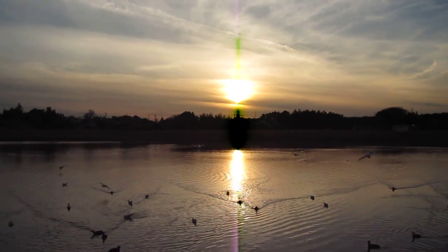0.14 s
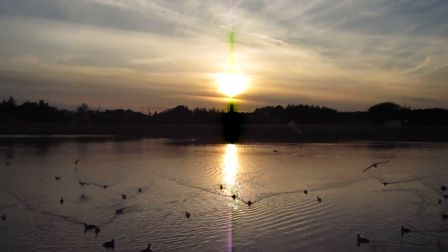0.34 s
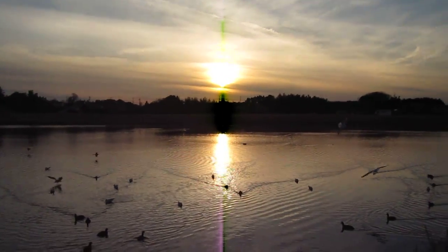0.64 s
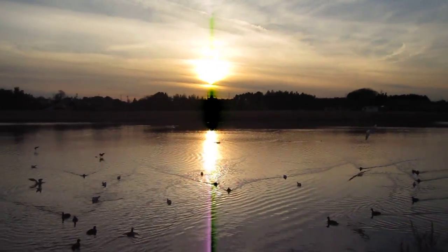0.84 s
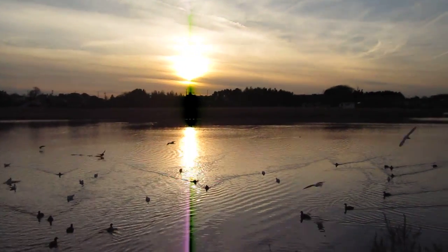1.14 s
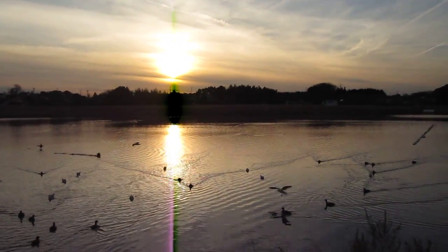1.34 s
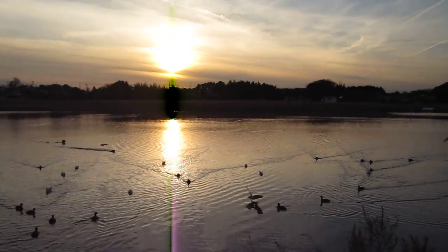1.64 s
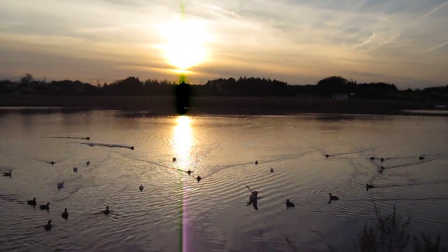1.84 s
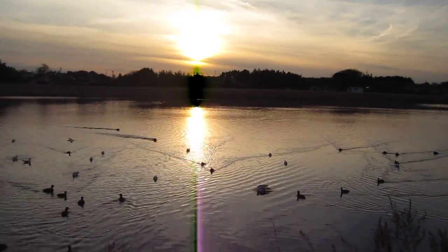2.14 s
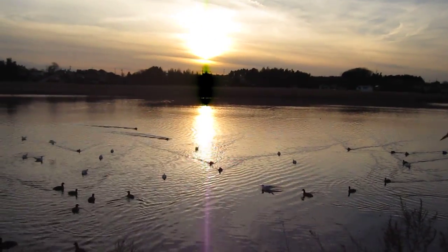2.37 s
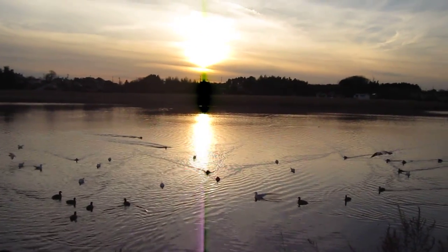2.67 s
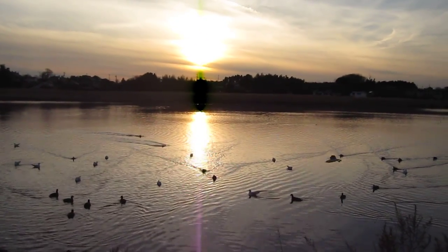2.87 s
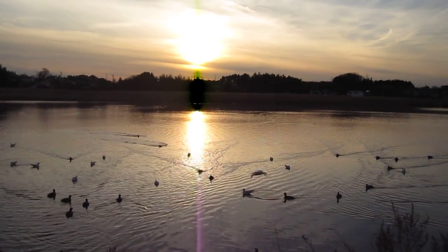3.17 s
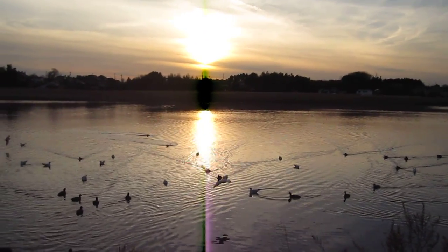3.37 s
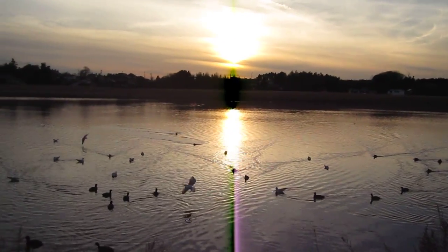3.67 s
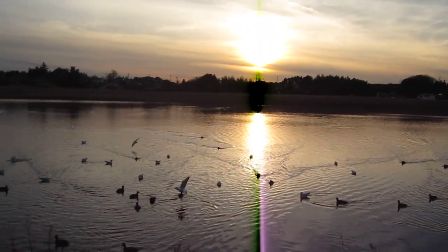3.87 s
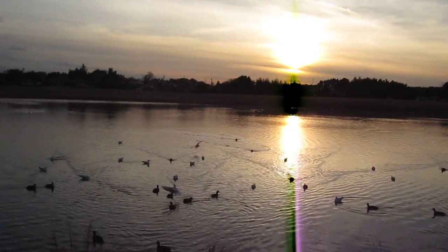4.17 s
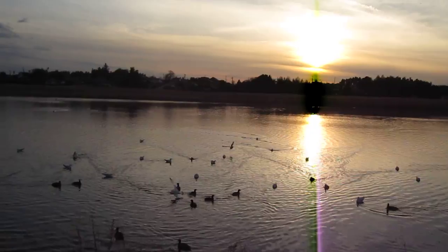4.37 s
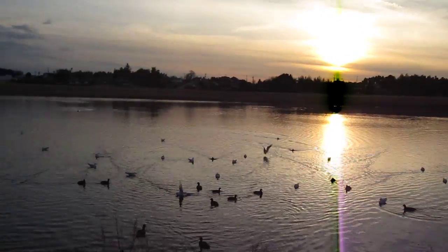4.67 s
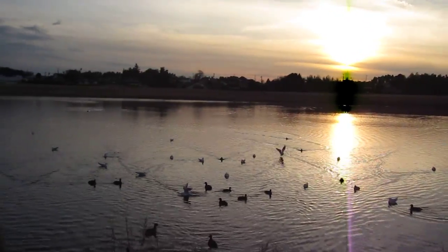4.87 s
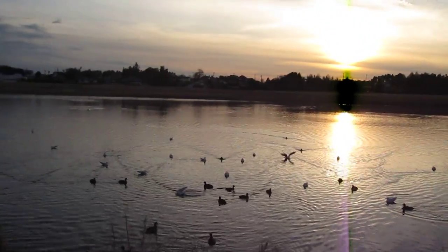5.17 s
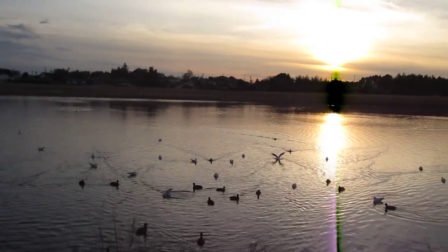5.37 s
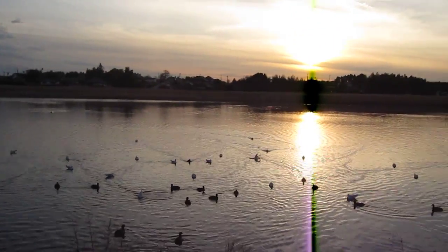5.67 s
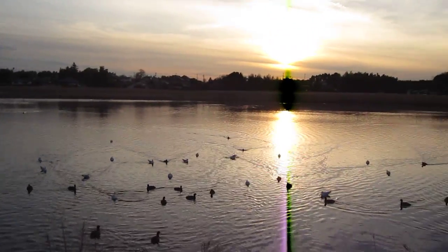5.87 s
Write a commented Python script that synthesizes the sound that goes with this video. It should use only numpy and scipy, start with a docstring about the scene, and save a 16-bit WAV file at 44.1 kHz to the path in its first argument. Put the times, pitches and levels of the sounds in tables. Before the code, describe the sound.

A quiet lakeside heard from the bank, with steady, faint, low-weighted outdoor noise throughout. From about 0.7 s small plops and drops appear, with one strong hollow plop near 1.0 s; splashing swells into a light fizz of bubbles and spray, busiest around 1.2 to 1.9 s. At 1.96 s a gull yelps sharply upward, then screams until 2.58 s: a high whistle sinking in pitch, roughened by an unstable lower voice and rasp. Gentle stirring continues, with crisp drops around 2.7 to 2.95 s and rounder plops near 3.4 s. At 4.04 s a second yelp rises into another falling scream, more broken, with a ragged croak and brief buzz around 4.4 to 4.5 s, ending near 4.6 s. A faint dull echo trails each cry. Splashing then dwindles; soft low bumps brush the microphone around 5.1 to 5.5 s, leaving quiet air and tiny water sounds.

```python
"""Two harsh gull screams over a calm lake, heard from the bank.
Each opens with a rising harmonic yelp, then splits into a high whistle and an irregular lower voice;
the two multiply into sum and difference tones, with rasping noise. The second also croaks and buzzes.
Water birds splash and plop: ringing bubbles, drops and noise spray.
Steady filtered noise lies far off; a few soft low bumps reach the microphone."""
import sys
import numpy as np
from scipy import signal
from scipy.fft import rfft, irfft, next_fast_len
from scipy.io import wavfile

SR = 44100
rng = np.random.default_rng(int(sys.argv[2]) if len(sys.argv) > 2 else 0)


def bounce(signal):
    """Save signal as a 16-bit WAV file at the path given by the first command-line argument."""
    frames = np.transpose(np.atleast_2d(signal))
    limited = np.clip(frames, -1, 1)
    pcm = np.round(limited * 32767).astype(np.int16)
    wavfile.write(sys.argv[1], SR, pcm)


N = 265237
T = np.arange(N) / SR


def undb(db):
    """Decibels to amplitude gain."""
    return 10 ** (np.asarray(db) / 20)


def unit(x):
    """Scale to rms 1."""
    return x / np.sqrt(np.mean(np.abs(x) ** 2))


def curves(rows):
    """Table columns after the first, interpolated over time."""
    s, *columns = np.transpose(rows)
    return [np.interp(T, s, c) for c in columns]


def gate(start_s, end_s, edge_s):
    """Open from start to end, with linear edges."""
    inside_s = np.minimum(T - start_s, end_s - T)
    return np.clip(inside_s / edge_s + .5, 0, 1)


def hump(centre_s, width_s):
    """Gaussian swell to 1; width is to 1/e."""
    return np.exp(-((T - centre_s) / width_s) ** 2)


def colour(x, points):
    """Filter by a spectrum of (freq_hz, gain_db) points; rms 1."""
    point_hz, point_db = np.transpose(points)
    size = next_fast_len(N)
    hz = np.maximum(np.arange(size // 2 + 1) * SR / size, 1)
    gain = undb(np.interp(np.log(hz), np.log(point_hz), point_db))
    return unit(irfft(rfft(x, size) * gain, size)[:N])


def wander(rate_hz):
    """Low-passed noise, rms 1: random change up to about rate_hz."""
    lowpass = signal.butter(2, rate_hz, fs=SR, output="sos")
    return unit(signal.sosfilt(lowpass, rng.standard_normal(N)))


def add(out, start_s, sound):
    """Mix a short sound into out."""
    i = int(start_s * SR)
    out[i:i + len(sound)] += sound[:N - i]


def turns(hz):
    """Oscillator phase in radians: the running sum of frequency."""
    return 2 * np.pi * np.cumsum(hz) / SR


def harmonics(phase, tones):
    """Stack of (multiple, level_db) partials on one phase."""
    return sum(undb(db) * np.sin(round(k) * phase) for k, db in tones)


# distant noise spectrum: freq_hz, density_db
AIR_SPECTRUM = [(15, -26), (25, -5), (45, 0), (65, -1.5), (188, -7.5), (291, -7.5), (427, -11), (503, -12),
                (661, -12.5), (822, -11.5), (892, -13), (1270, -14), (1700, -15.5), (2050, -18.5),
                (2520, -23), (3490, -23), (6360, -26.5), (17000, -35.5)]
AIR_RMS_DB = -48


def air():
    """Steady far-off outdoor noise: white noise shaped by a fixed spectrum."""
    return colour(rng.standard_normal(N), AIR_SPECTRUM) * undb(AIR_RMS_DB)


def bubble(hz, ring_s, glide_oct):
    """Air pocket: swells quickly, rings and decays; pitch rises glide_oct per ring_s as it surfaces."""
    age = T[:int(2 * ring_s * SR)] / ring_s
    swell = age ** 2 * np.exp(-11 * age)
    return swell / swell.max() * np.sin(turns(hz * 2 ** (glide_oct * age)))


# soft microphone bumps: start_s, level_db, pitch_hz
MIC_BUMPS = [(5.062, -48, 88), (5.317, -36.5, 84.5), (5.349, -35.5, 89), (5.475, -38.5, 80)]


def bumps():
    """Dull knocks of a cycle or two on the microphone: low rings of constant pitch."""
    out = np.zeros(N)
    for start_s, level_db, pitch_hz in MIC_BUMPS:
        add(out, start_s, undb(level_db) * bubble(pitch_hz, ring_s=0.033, glide_oct=0))
    return out


# course of the stirring before STIR_GAIN_DB: time_s, relative_db
STIR_COURSE = [(0.0, -69), (0.526, -73), (0.982, -55.5), (1.65, -50.5), (2.85, -53.5), (3.5, -58.5),
               (4.75, -56), (5.3, -66)]
# brief small rises and dips in the stirring: centre_s, change_db
STIR_SWELLS = [(1.36, 1), (1.54, -1), (1.65, 0.5)]
STIR_GAIN_DB, SWELL_WIDTH_S = 8, 0.03


def stirring():
    """Gain for how hard the birds stir the water: a slow course, nudged up or down for a moment."""
    course_db, = curves(STIR_COURSE)
    swells_db = sum(change_db * hump(s, SWELL_WIDTH_S) for s, change_db in STIR_SWELLS)
    return undb(course_db + STIR_GAIN_DB + swells_db)


# splash spectrum: freq_hz, gain_db
SPLASH_SPECTRUM = [(150, -14.5), (400, -4.5), (750, 0), (1100, -1), (2300, 0), (2700, -3.5), (3500, -2),
                   (5500, -9.5), (8000, -13), (12000, -20), (16000, -43)]


def splashing(count=2000, db_per_log_size=1.0, bubbles_db=-7.0, spray_db=-2):
    """Feet and wings stir the water: many small bubbles and a crackle of modulated noise spray."""
    fizz = np.zeros(N)
    for when, pitch, size in rng.random((count, 3)):
        hz = 550 * 12 ** pitch
        gain = undb(db_per_log_size * np.log(size + 0.013)) * np.sqrt(hz)
        add(fizz, when * T[-1], gain * bubble(hz, ring_s=11 / hz, glide_oct=0.031))
    crackle_db = 2.8 * wander(1500) + 1.9 * wander(45)
    spray = rng.standard_normal(N) * undb(crackle_db)
    bubbles = undb(bubbles_db) * colour(fizz, SPLASH_SPECTRUM)
    return stirring() * (bubbles + undb(spray_db) * colour(spray, SPLASH_SPECTRUM))


# sharpest drops: start_s, peak_db, pitch_hz, spray_decay_ms, spray_0_1
SHARP_DROPS = [(.823, -33.5, 2280, 1.6, .3), (.877, -37.5, 3800, 1.2, 1), (.957, -35, 4700, 2.8, 1),
               (.992, -32.5, 2700, 2.9, 0.5), (1.108, -35, 5000, 2.4, 1), (1.178, -37, 4020, 2, 1),
               (1.325, -35, 3800, 2.4, 1), (1.39, -33, 2175, 2, 0.5), (1.437, -33, 2300, .6, .8),
               (1.451, -34, 4260, 2.8, 1), (1.534, -36, 2240, 1.6, 0.2), (1.652, -30.5, 2410, 1.6, 0.14),
               (1.713, -30, 2260, 1.8, 0.1), (1.728, -33, 4100, 1.5, 1), (2.706, -35, 4400, 1.6, 1),
               (2.745, -28.5, 1860, 1.8, 0.47), (2.842, -27, 2130, 1.7, 0.7),
               (2.885, -31.5, 3800, 0.81, .8), (2.943, -31.5, 2360, .7, 0.34),
               (3.21, -34.5, 2070, 1.5, 0.4)]


def drops(ring_cycles=4.1):
    """Drops hit the surface: a few cycles of ring and a tick of noise spray from that pitch upward."""
    out, t = np.zeros(N), T[:SR // 50]
    for start_s, peak_db, hz, decay_ms, spray in SHARP_DROPS:
        edges_hz = [hz, min(hz * 1.32, SR / 3)]
        band = signal.butter(1, edges_hz, "bandpass", fs=SR, output="sos")
        burst = rng.standard_normal(len(t)) * np.exp(-1000 * t / decay_ms)
        tick = signal.sosfilt(band, burst)
        ring = np.sin(2 * np.pi * hz * t) * np.exp(-t * hz / ring_cycles) * (1 - np.exp(-t * hz))
        hit = spray * tick / np.abs(tick).max() + .5 * ring
        add(out, start_s, undb(peak_db) * hit / np.abs(hit).max())
    return out


def plop(crest_s, hz, width_s, slosh_db, stretch=4.0, spread=1.38):
    """Air pocket swells and dies within a few cycles, in a longer slosh of noise about its pitch."""
    t = T[:SR // 8] - T[SR // 16]
    ratio = max(spread, 1.1)
    band = signal.butter(2, [hz / ratio, hz * ratio], "bandpass", fs=SR, output="sos")
    noise = unit(signal.sosfilt(band, rng.standard_normal(len(t))))
    slosh = noise * np.exp(-(t / (stretch * width_s)) ** 2)
    ring = np.sin(2 * np.pi * hz * t) * np.exp(-(t / width_s) ** 2)
    out = np.zeros(N)
    add(out, crest_s + t[0], ring + undb(slosh_db) * slosh)
    return out


# loudest plops: crest_s, level_db, pitch_hz, half_width_ms, slosh_db (re ring)
LOUD_PLOPS = [(.735, -45, 690, 3.3, -12), (.824, -36, 780, 3, -13), (.897, -41, 800, 3, -12),
              (.929, -34, 644, 3.5, -14), (.937, -36, 637, 2.5, -12), (.987, -23, 715, 3.2, -15),
              (1.109, -40, 690, 4, -12), (1.212, -38, 667, 3.8, -17), (1.224, -36, 570, 3.5, -15),
              (1.232, -31, 540, 3.8, -14), (1.348, -39, 670, 4.8, -13), (1.367, -39, 1150, 3.5, -5.5),
              (1.409, -41, 840, 4, -12), (1.503, -36.5, 720, 4.4, -8), (1.533, -37.5, 690, 4.8, -12),
              (1.559, -39, 1050, 3, -1.5), (1.582, -39.5, 650, 4, -11), (1.632, -40, 900, 3.2, -5),
              (1.792, -40, 650, 4.5, -8), (1.819, -38.5, 1030, 3, -7), (1.831, -40, 700, 3, -8),
              (1.841, -41, 1300, 3, -5), (1.865, -37, 620, 4, -9.5), (1.906, -38, 1750, 3, -7),
              (2.595, -37, 1570, 4.1, -11), (2.72, -40.5, 1034, 9.6, -14), (2.907, -37.5, 780, 3, -11),
              (2.994, -41, 1120, 3, -10), (3.347, -36.5, 970, 4.2, -21), (3.421, -32.5, 680, 3.4, -14),
              (3.433, -39.5, 1500, 2.2, -5.5), (3.473, -40, 1930, 3, -24), (5.151, -41.5, 1180, 2.1, -12),
              (5.416, -44, 704, 8.2, -16)]
PLOP_GLIDE_OCT = 0.15


def plops(count=60, small_db=-7.0, spread_db=10, low_hz=680, octaves=1.34, ring_s=0.021):
    """Birds dip and paddle: set plops, and small ones as loud as the stirring; churn makes them uneven."""
    loud = sum(undb(level_db) * plop(crest_s, hz, half_width_ms / 1000, slosh_db)
               for crest_s, level_db, hz, half_width_ms, slosh_db in LOUD_PLOPS)
    small = np.zeros(N)
    for when, pitch, size in rng.random((count, 3)):
        hz = low_hz * 2 ** (octaves * pitch)
        add(small, when * T[-1], undb(small_db - spread_db * size) * bubble(hz, ring_s, PLOP_GLIDE_OCT))
    churn = 1 + .15 * wander(300)
    return (loud + small * stirring()) * churn


# opening yelps: start_s, end_s, start_hz, end_hz, level_db (before swell), swell_db
OPENING_YELPS = [(1.96, 1.995, 990, 1400, -24, 4.5), (4.044, 4.077, 763, 1236, -16, 15)]
# throat response in each yelp: freq_hz, gain_db
YELP_1_THROAT = [(950, -3), (1250, -3), (1450, 1), (1900, -7), (2250, -2), (2480, 2.5), (2750, -11),
                 (3000, -7), (3350, -3), (3650, -19), (4100, -7), (4650, 1), (5100, -11), (5600, -15),
                 (5950, -17), (6550, -5), (7400, -18), (9300, -35), (12000, -20), (16000, -27)]
YELP_2_THROAT = [(750, -12), (1150, -7), (1600, 8.5), (2000, 5.5), (2350, 7.5), (2650, 2), (3000, 2),
                 (3600, -21), (4700, -5), (5400, -27), (6800, -5), (7500, -26), (9500, -27), (11300, -20),
                 (16000, -40)]
YELP_EDGE_S = .008


def yelp(row, throat, dull_db, jitter=0.011, bend=1.3, count=12):
    """Both syrinx sides lock on one rising pitch; harmonics flare as they cross throat resonances."""
    start_s, end_s, start_hz, end_hz, level_db, swell_db = row
    progress = np.clip((T - start_s) / (end_s - start_s), 0, 1) ** bend
    hz = start_hz * (end_hz / start_hz) ** progress
    tones = []
    for k in range(1, count + 1):
        # harmonics above the second come in as the yelp swells
        dulling_db = dull_db * (k > 2) * (1 - progress)
        tones.append((k, np.interp(k * hz, *np.transpose(throat)) - dulling_db))
    voice = harmonics(turns(hz * (1 + jitter * wander(420))), tones)
    voice = voice / voice[(T > start_s) & (T < end_s)].std()
    swell = undb(level_db - swell_db * (1.5 - progress))
    return voice * swell * gate(start_s, end_s, YELP_EDGE_S)


# bright buzz partials: multiple, level_db
BUZZ_PARTIALS = [(6, -52), (7, -53), (8, -69)]
# croak spectrum: freq_hz, gain_db
CROAK_SPECTRUM = [(1400, -4), (2700, -5), (3900, 1), (4800, 2.5), (5300, 1), (5700, -5), (6200, -1),
                  (6800, -17), (8400, -11.5), (9500, -29), (16000, -36)]
CROAK_START_S, CROAK_END_S, CROAK_DB = 4.403, 4.461, -37.5
BUZZ_START_S, BUZZ_END_S = 4.475, 4.508


def croak(course, jitter=0.06, hiss=0.87):
    """Ragged pulses and air puffs an octave below the whistle ring the throat; an even buzz follows."""
    hz, = curves(course)
    phase = turns(hz / 2 * (1 + jitter * wander(590)))
    pulses = unit(sum(np.cos(k * phase) for k in range(1, 10)))
    puffs = unit(rng.standard_normal(N) * (1 + np.cos(phase)))
    hoarse = unit(colour(pulses, CROAK_SPECTRUM) + hiss * colour(puffs, CROAK_SPECTRUM))
    buzz_phase = turns(hz / 2 * (1.01 + 0.003 * wander(300)))
    buzz = harmonics(buzz_phase, BUZZ_PARTIALS) * gate(BUZZ_START_S, BUZZ_END_S, 0.012)
    return undb(CROAK_DB) * hoarse * gate(CROAK_START_S, CROAK_END_S, 0.012) + buzz


BEAK_HZ, BEAK_WIDTH_HZ, BEAK_DB = 11120, 170, 15


def beak(x):
    """The open beak rings in the high treble: one narrow resonant peak."""
    b, a = signal.iirpeak(BEAK_HZ, BEAK_HZ / BEAK_WIDTH_HZ, fs=SR)
    return x + (undb(BEAK_DB) - 1) * signal.lfilter(b, a, x)


def whistle(phase, effort_db, tones, flutter_db, overtone_flutter_db=3.5, brighten=0.19):
    """Nearly pure tone; overtones follow effort, flicker, and smear more the higher they lie."""
    out = np.sin(phase)  # the fundamental's own table level is not used
    for k, db in tones[1:]:
        smear_rad = .38 * (k - 1) * wander(450)
        level_db = db + brighten * (k - 1) * effort_db + overtone_flutter_db * wander(42)
        out = out + undb(level_db) * np.sin(round(k) * phase + smear_rad)
    return out * np.sqrt(2) * unit(undb(flutter_db * wander(98)))


# lower voice locked to a clear tone: start_s, end_s, pitch_share (of whistle), purity_0_1
CLEAR_LOCKS = [(2.002, 2.015, 0.58, 0.7), (2.002, 2.017, 0.3, 0.17), (2.042, 2.056, 0.62, .45),
               (2.066, 2.096, 0.586, 0.8), (2.139, 2.2, .459, 0.25), (2.295, 2.321, .6, .3),
               (2.488, 2.527, 0.61, 0.7), (4.174, 4.19, 0.54, 0.8), (4.253, 4.261, 0.62, 1),
               (4.268, 4.274, 0.66, 0.8), (4.288, 4.293, 0.66, 0.6), (4.294, 4.318, 0.51, 0.67),
               (4.452, 4.482, 0.62, 0.8), (4.478, 4.506, 0.5, 0.7), (4.538, 4.552, 0.52, 0.68)]


def locked_tone(phase):
    """Clear stretches of the lower voice at fixed ratios to the whistle: waveform and power share."""
    tone, held = 0, 0
    for start_s, end_s, share, purity in CLEAR_LOCKS:
        weight = np.clip(purity, 0, 1) * gate(start_s, end_s, 0.0049)
        tone = tone + np.sqrt(weight) * np.exp(1j * share * phase)
        held = held + weight
    return tone, np.clip(held, 0, 1)


def limit(swing, ceiling=3.7):
    """A membrane can swing only so far: round off the surges; rms 1."""
    return unit(swing / np.sqrt(1 + np.abs(unit(swing) / ceiling) ** 2))


def share_air(voice):
    """Two voices draw on one air stream: quick power surges are evened against the slower mean."""
    power = np.abs(signal.hilbert(voice)) ** 2 + 1e-9
    quick_window, slow_window = np.hanning(SR // 1800), np.hanning(SR // 60)
    quick = signal.fftconvolve(power, quick_window / quick_window.sum(), "same")
    slow = signal.fftconvolve(power, slow_window / slow_window.sum(), "same")
    return voice * np.sqrt(2.2 / (1 + quick / slow))


# whistle pitch: time_s, pitch_hz
PITCH_1 = [(1.996, 3816), (2.012, 3803), (2.048, 3680), (2.084, 3614), (2.098, 3686), (2.23, 3558),
           (2.252, 3490), (2.328, 3567), (2.396, 3294), (2.448, 3152), (2.504, 2840), (2.56, 2689),
           (2.578, 2530)]
PITCH_2 = [(4.08, 3687), (4.175, 3652), (4.205, 3580), (4.226, 3408), (4.252, 3300), (4.31, 3418),
           (4.36, 3447), (4.4, 3354), (4.462, 2896), (4.54, 2617), (4.566, 2414), (4.59, 2047)]
# rows whistle, lower voice, sum tones, rasp: onset_db, fade_db_per_s, fade_db_per_oct2 (negative grows)
LEVELS_1 = [(-29, 16.5, 27), (-34.5, -2.5, 42), (-30, 6.5, 72), (-31, 2.5, 119)]
LEVELS_2 = [(-34, -3, 21.8), (-31, 22.5, 6.7), (-45, 17, 42), (-44, -17, 92)]
# unstable lower-voice modes: pitch_share (of whistle at onset), width_hz, level_db, sum_tone_db
MODES_1 = [(.457, 29.7, 5, 7), (.518, 129, -0.5, -16), (.574, 40, 7.5, 15), (.64, 190, 4, -18)]
MODES_2 = [(.485, 54.6, 10.6, 2.7), (.56, 110.3, 10.4, 1), (.63, 149.6, 9, 12)]
# throat response to the lower voice: freq_hz, gain_db
LOWER_THROAT_1 = [(900, -2), (1450, -3.5), (1620, 1.5), (1900, 0), (2120, 0.5), (2400, 0), (3000, 1)]
LOWER_THROAT_2 = [(900, -5), (1250, 1.5), (1450, -3), (1650, -1), (2050, 1), (2450, -0.5), (2650, -4),
                  (3200, -9)]
# whistle partials: multiple, level_db
PARTIALS_1 = [(1, -1), (2, -8.5), (3, -17), (4, -27)]
PARTIALS_2 = [(1, 3), (2, -17.5), (3, -31.5), (4, -39)]
# open-beak rasp spectrum: freq_hz, gain_db
RASP_SPECTRUM_1 = [(600, -54), (1200, -7), (2300, 1.5), (2900, -2.5), (3400, 0), (4200, -2), (5400, 3),
                   (6600, -5.5), (8300, -31), (9500, -17), (11200, -13), (13300, -11), (16000, -43)]
RASP_SPECTRUM_2 = [(600, -20), (1300, -14), (2300, 8), (2750, 12), (3150, 9), (3700, -4), (4200, -2),
                   (4700, 8), (5300, -7), (6400, -7), (7300, -22), (8700, -11), (10000, -23), (13000, -28),
                   (16000, -32)]
# moments when the balance of whistle, lower voice and rough layers shifts; the whistle weakens or surges:
# centre_s, width_s, whistle_loss_db, lower_gain_db, sums_and_rasp_gain_db, lower_sag_oct
VOICE_SHIFTS = [(2.078, .008, -3, -3, 0.5, 0), (2.089, 0.0022, 3, -5, -6, 0.022),
                (2.108, 0.0025, 9, -14, 0, 0), (4.215, 0.02, 17, 4.5, -0.5, 0.022),
                (4.265, 0.05, 4.5, -0.5, 3.5, 0), (4.378, 0.029, -4.5, 0, -1.5, 0),
                (4.432, 0.025, 13, 1.5, -1, 0.29), (4.487, .02, -4, 1.5, -10, 0.0041)]
ROUGH_LEAD_S = 0.029  # rough layers stop this long before the whistle
LOCK_DB = 6  # lift of a fully locked lower voice; sum tones get half
THROAT_HZ, THROAT_WIDTH_HZ, THROAT_DB = 2190, 170, 11.5  # lifts the whistle near this pitch


def scream(course, layers, lower, lower_throat, tones, rasp_colour, jitter, flutter_db,
           top_db, under_db, throb_db, smear_rad, follow):
    """One syrinx side whistles; the other vibrates irregularly and modulates it."""
    hz, = curves(course)
    start_s, end_s = course[0][0], course[-1][0]
    age_s = np.clip(T - start_s, 0, end_s - start_s)
    sunk_oct = np.log2(hz[0] / hz)
    whistle_db, lower_db, sums_db, rasp_db = (
        onset_db - fade * age_s - sink * sunk_oct ** 2 for onset_db, fade, sink in layers)
    loss_db, lower_gain_db, rough_gain_db, sag_oct = sum(
        np.outer(changes, hump(s, width_s)) for s, width_s, *changes in VOICE_SHIFTS)

    pitch_hz = hz * (1 + jitter * wander(360) + 0.002494 * wander(61))
    phase = turns(pitch_hz)
    # the lower voice follows the whistle's fall only in part
    lower_phase = turns(pitch_hz * 2 ** ((1 - follow) * sunk_oct - sag_oct))
    low, mixed = 0, 0
    for share, width_hz, level_db, sum_tone_db in lower:
        # each mode slips in pitch and surges in strength
        slip = turns(8 * np.sqrt(width_hz) * wander(290))
        surge = unit(undb(1.7 * wander(1.0 * width_hz)))
        mode = surge * np.exp(1j * (share * lower_phase + slip))
        low = low + undb(level_db) * mode
        mixed = mixed + undb(sum_tone_db) * mode
    tone, held = locked_tone(phase)
    low = limit(low) * np.sqrt(1 - held) + tone
    mixed = limit(mixed) * np.sqrt(1 - held ** 2) + tone * np.sqrt(held)

    # voices multiply: sums above the whistle and its overtones, a difference under its octave
    carrier = np.exp(1j * (phase + smear_rad * (1 - held) * wander(280)))
    above = mixed * (carrier + undb(top_db) * (carrier ** 2 + carrier ** 3))
    under = undb(under_db) * np.conj(mixed) * carrier ** 2
    sums = unit((above + under).real)
    # rasp bursts as the lower voice surges
    rasp = colour(rng.standard_normal(N) * np.sqrt(np.abs(low)), rasp_colour)

    throat_db = THROAT_DB * np.exp(-((hz - THROAT_HZ) / THROAT_WIDTH_HZ) ** 2)
    effort_db = whistle_db - loss_db - whistle_db[0]
    clear = undb(whistle_db - loss_db + throat_db) * whistle(phase, effort_db, tones, flutter_db)
    lower_voice = undb(lower_db + lower_gain_db + LOCK_DB * held) * colour(low.real, lower_throat)
    throb = undb(rough_gain_db) * unit(undb(throb_db * wander(140)))
    sums_and_rasp = undb(sums_db + LOCK_DB * held / 2) * sums + undb(rasp_db) * rasp
    rough = (lower_voice + throb * sums_and_rasp) * gate(0, end_s - ROUGH_LEAD_S, 0.015)
    return gate(start_s, end_s, 0.0029) * share_air(clear + rough)


def gulls():
    """Two yelps and screams, with a faint, dull wash back from the banks: decaying noise as echo."""
    first = scream(PITCH_1, LEVELS_1, MODES_1, LOWER_THROAT_1, PARTIALS_1, RASP_SPECTRUM_1,
                   jitter=0.008, flutter_db=1.9, top_db=-20, under_db=-9,
                   throb_db=0.9, smear_rad=0.16, follow=0.7)
    second = scream(PITCH_2, LEVELS_2, MODES_2, LOWER_THROAT_2, PARTIALS_2, RASP_SPECTRUM_2,
                    jitter=0.0044, flutter_db=1.6, top_db=-17.5, under_db=-9,
                    throb_db=2.0, smear_rad=0.38, follow=0.9)
    dry = first + beak(second + croak(PITCH_2))
    dry = dry + yelp(OPENING_YELPS[0], YELP_1_THROAT, dull_db=2.0)
    dry = dry + yelp(OPENING_YELPS[1], YELP_2_THROAT, dull_db=13.0)
    wash = colour(rng.standard_normal(N), [(500, 0), (2500, 0), (9000, -14)])
    banks = wash * undb(-60 * T / 1.0) * (T > .03)  # 60 dB decay in 1 s, after 30 ms
    return dry + undb(-27) * signal.fftconvolve(dry, banks / np.linalg.norm(banks))[:N]


def scene():
    """Air, water and gulls at one microphone."""
    return (air() + bumps() + splashing() + drops() + plops() + gulls())[None]


TOP_HZ = 16800


def record(dry):
    """Steep elliptic low-pass: removes the treble above TOP_HZ."""
    return signal.sosfilt(signal.ellip(8, .2, 70, TOP_HZ, fs=SR, output="sos"), dry)


dry = scene()
out = record(dry)
bounce(out)
```